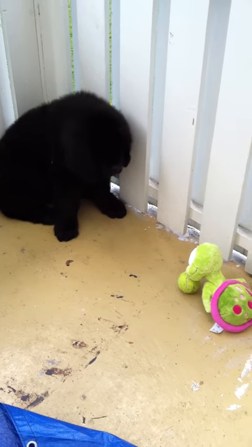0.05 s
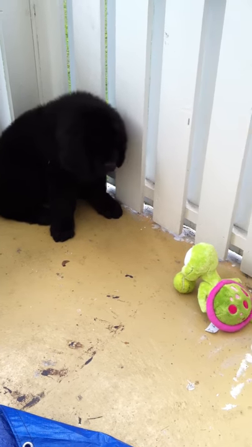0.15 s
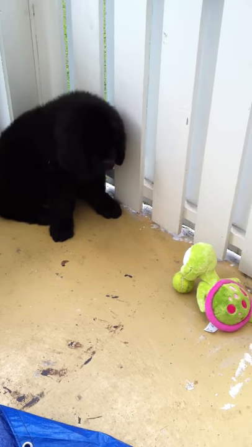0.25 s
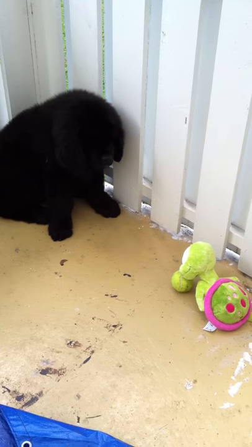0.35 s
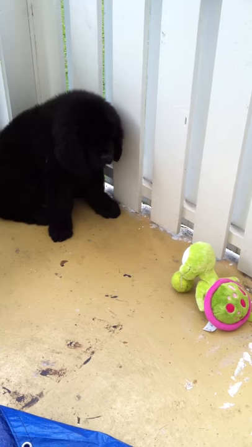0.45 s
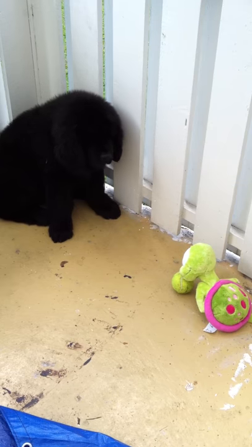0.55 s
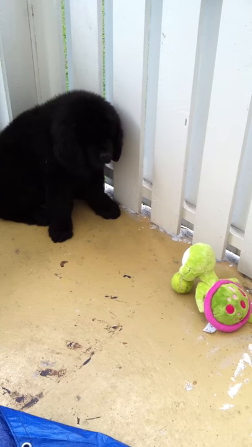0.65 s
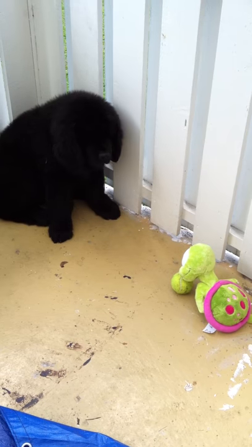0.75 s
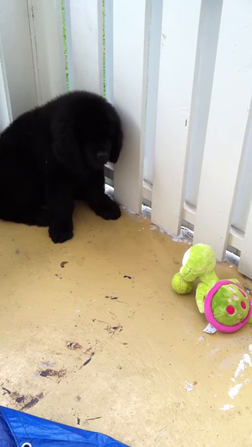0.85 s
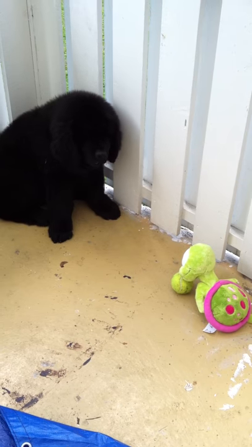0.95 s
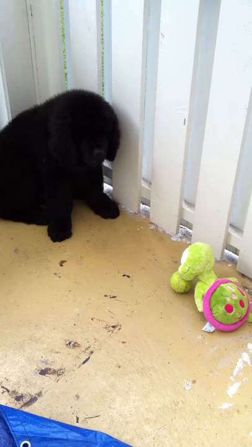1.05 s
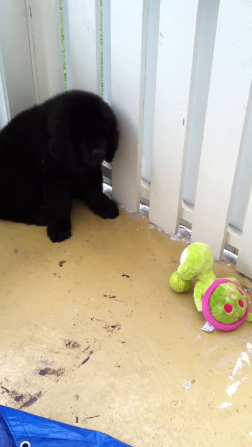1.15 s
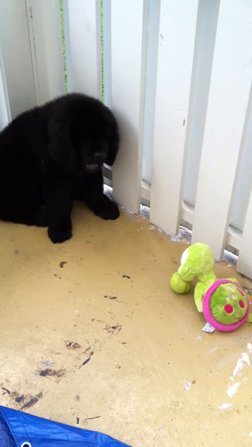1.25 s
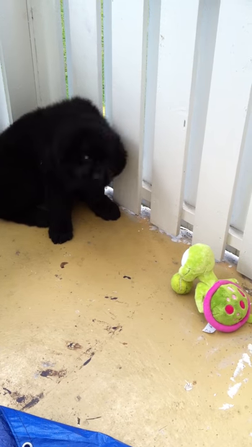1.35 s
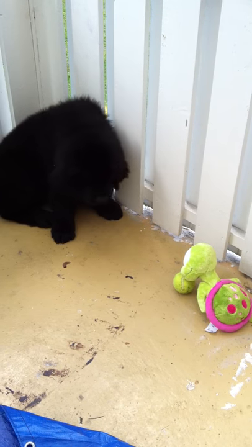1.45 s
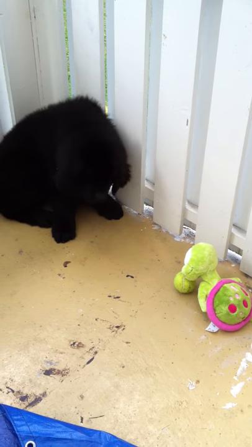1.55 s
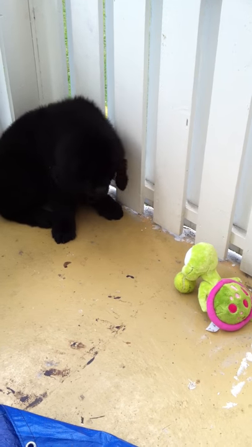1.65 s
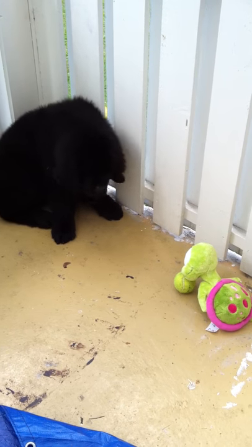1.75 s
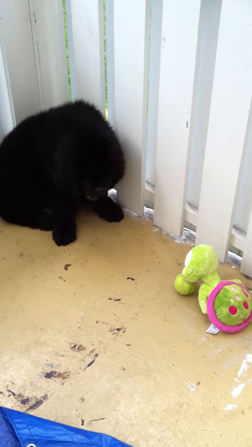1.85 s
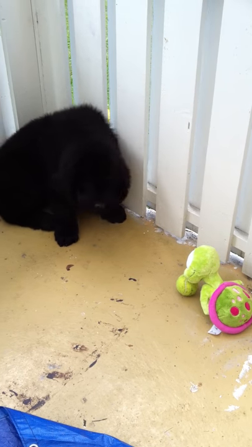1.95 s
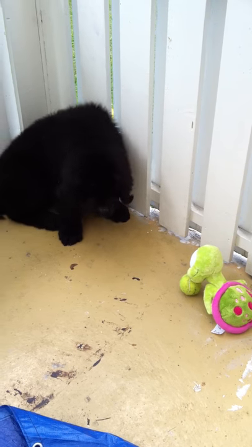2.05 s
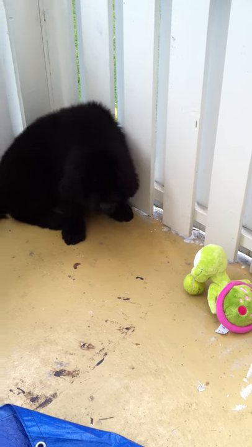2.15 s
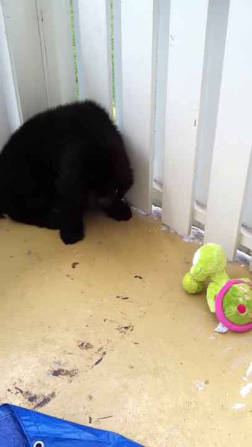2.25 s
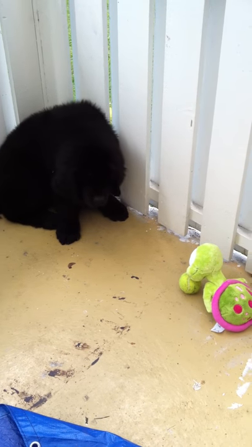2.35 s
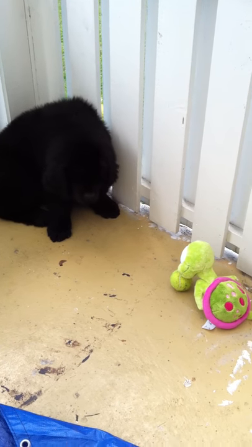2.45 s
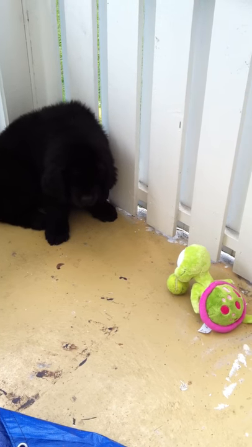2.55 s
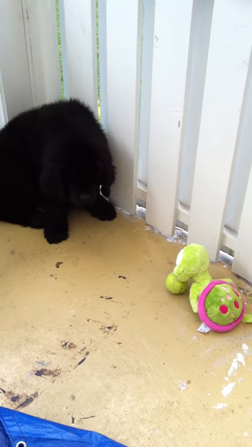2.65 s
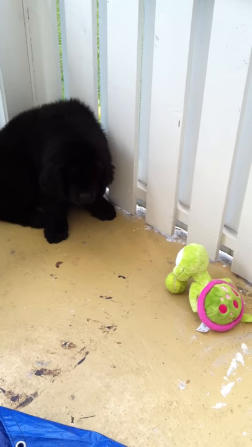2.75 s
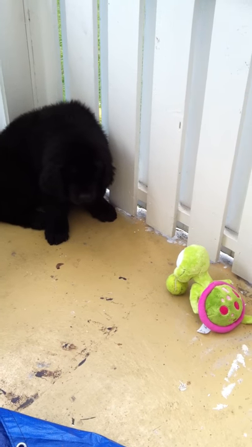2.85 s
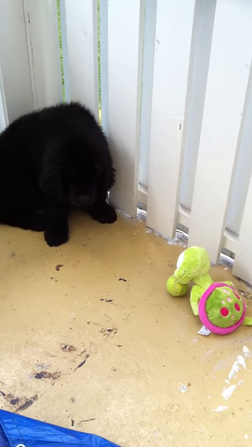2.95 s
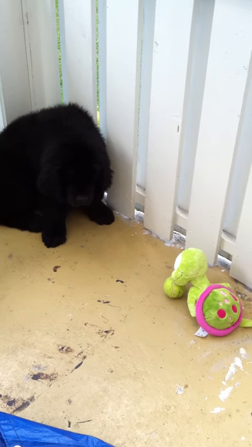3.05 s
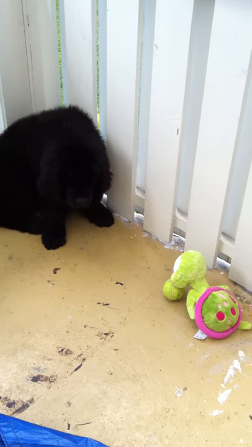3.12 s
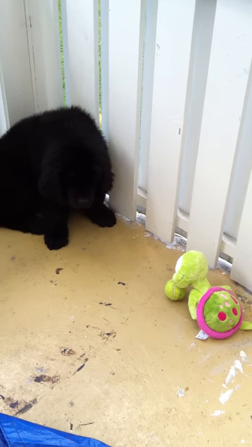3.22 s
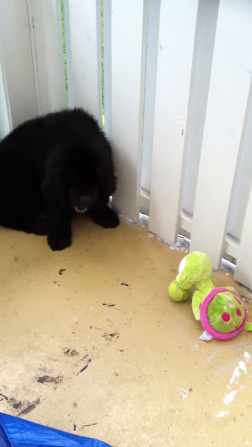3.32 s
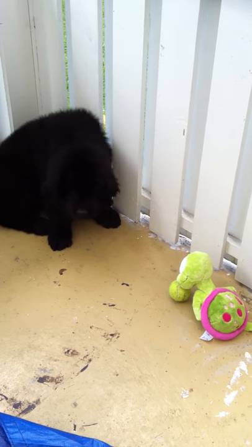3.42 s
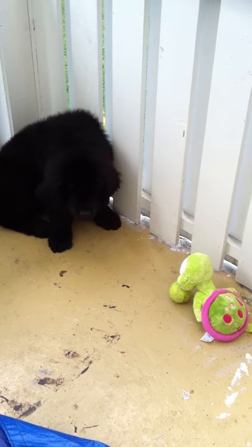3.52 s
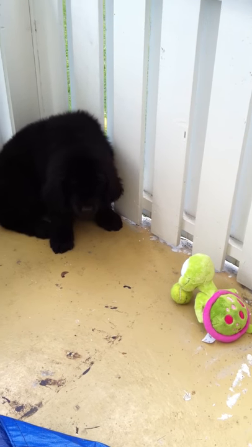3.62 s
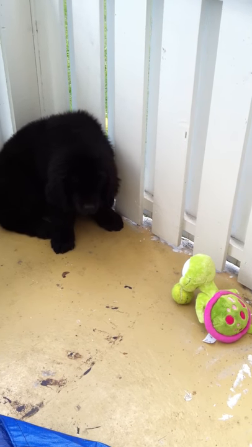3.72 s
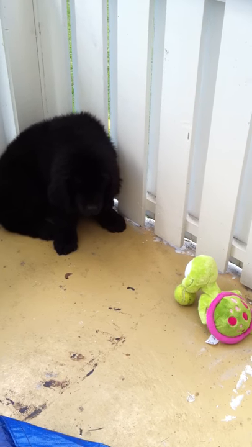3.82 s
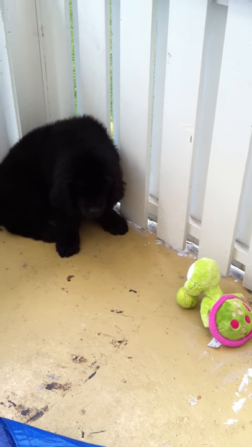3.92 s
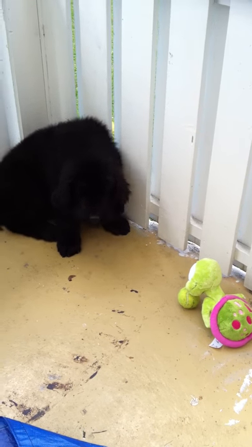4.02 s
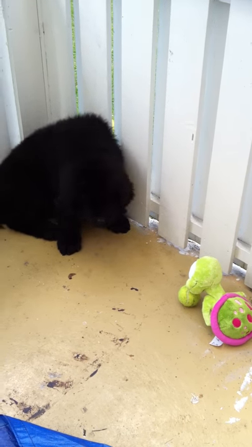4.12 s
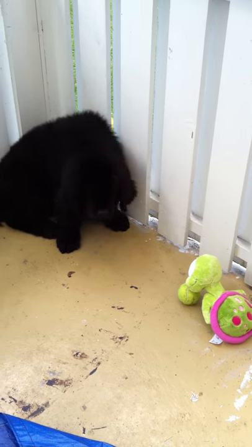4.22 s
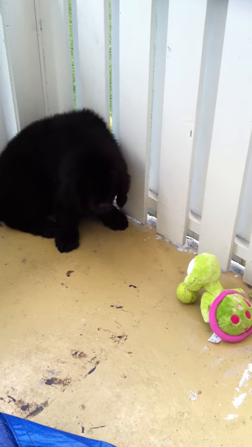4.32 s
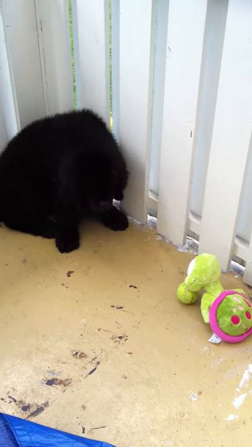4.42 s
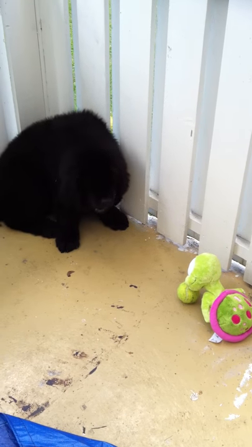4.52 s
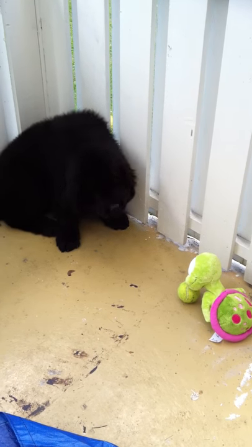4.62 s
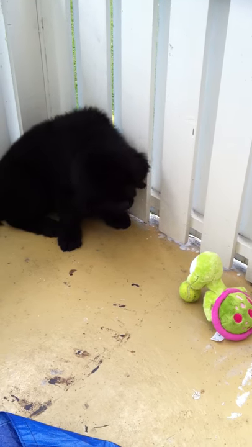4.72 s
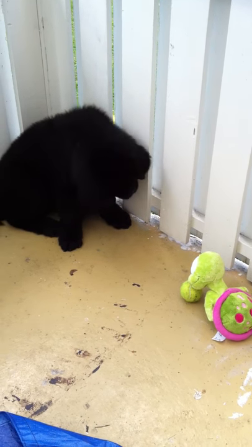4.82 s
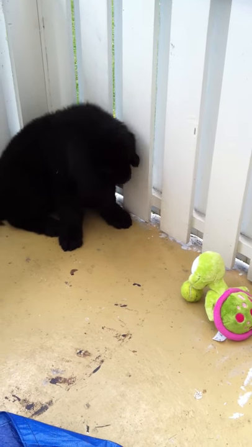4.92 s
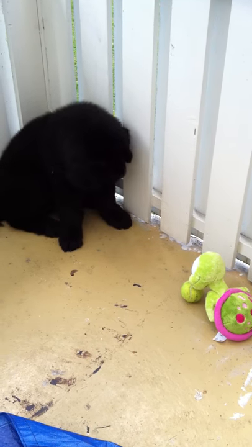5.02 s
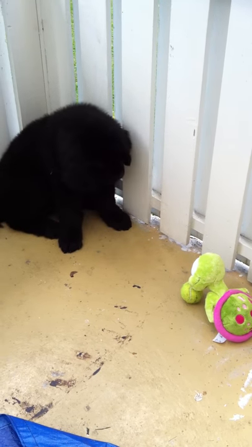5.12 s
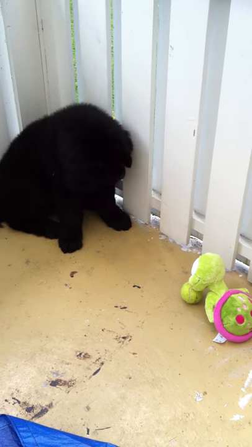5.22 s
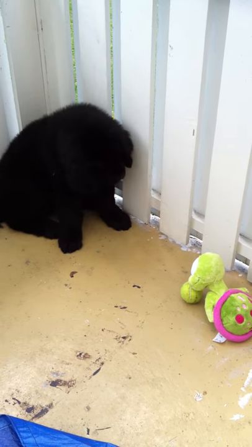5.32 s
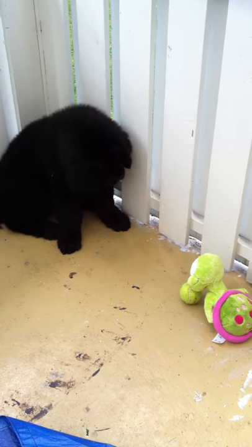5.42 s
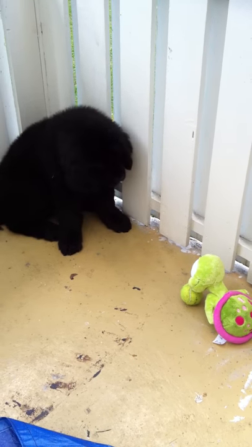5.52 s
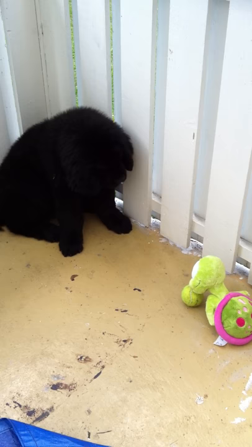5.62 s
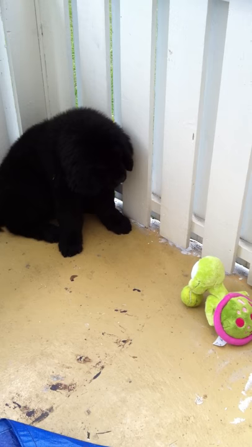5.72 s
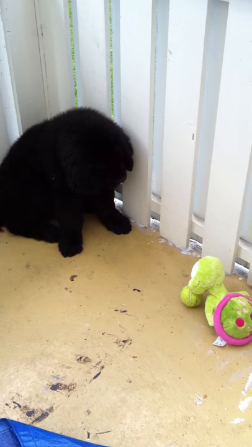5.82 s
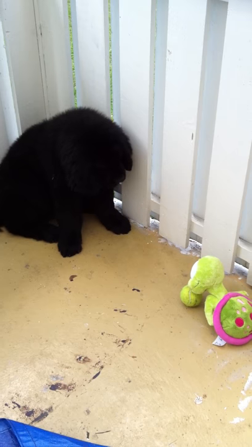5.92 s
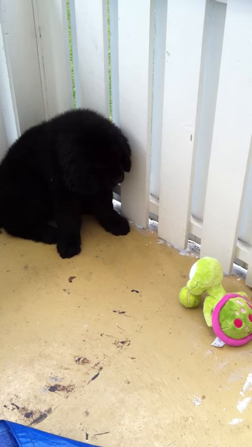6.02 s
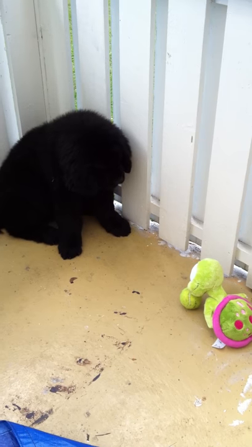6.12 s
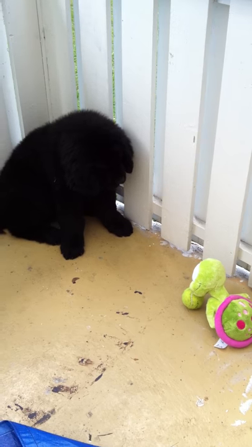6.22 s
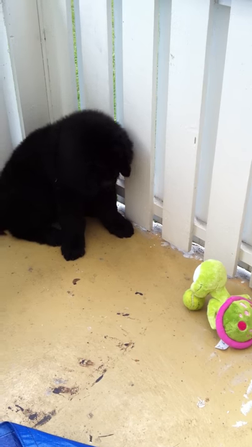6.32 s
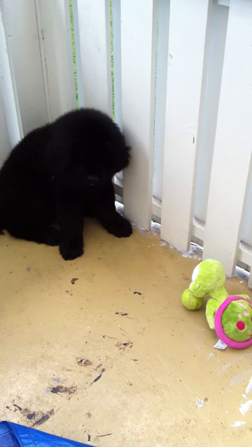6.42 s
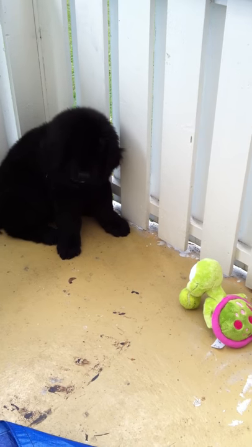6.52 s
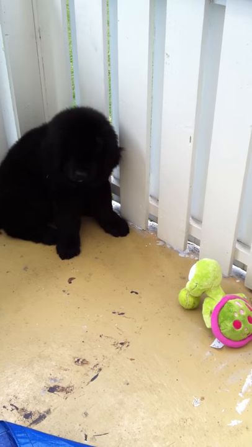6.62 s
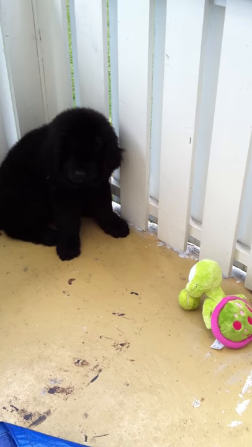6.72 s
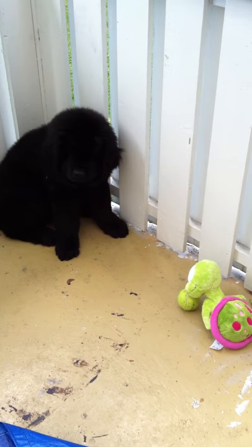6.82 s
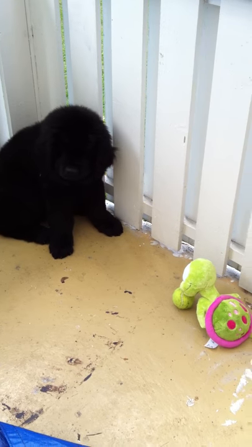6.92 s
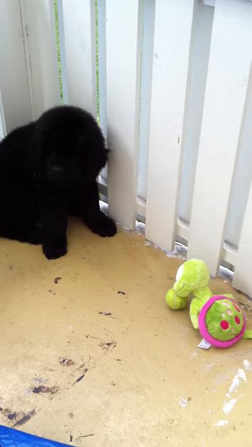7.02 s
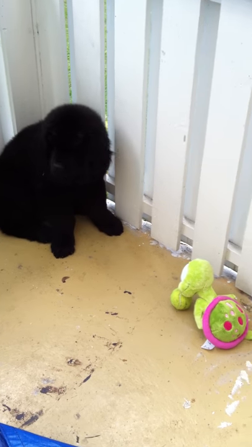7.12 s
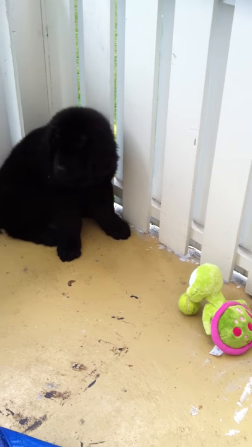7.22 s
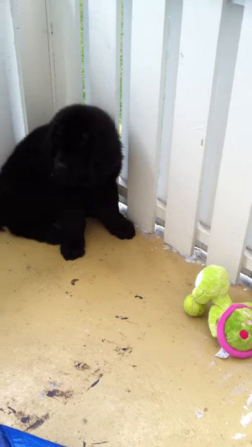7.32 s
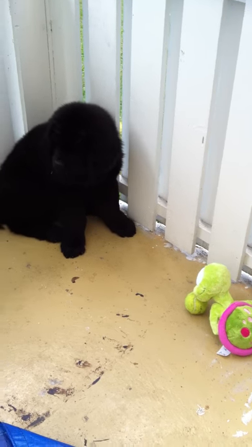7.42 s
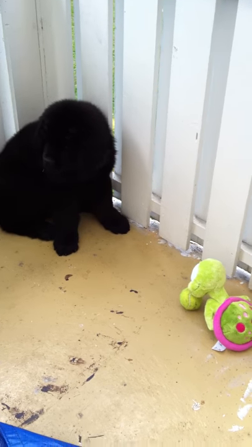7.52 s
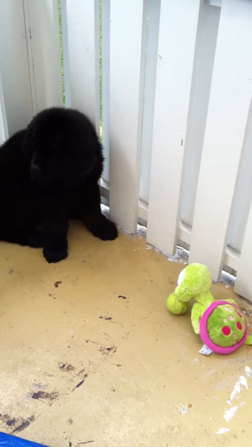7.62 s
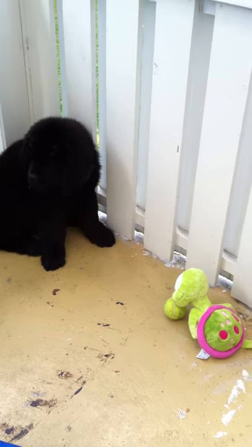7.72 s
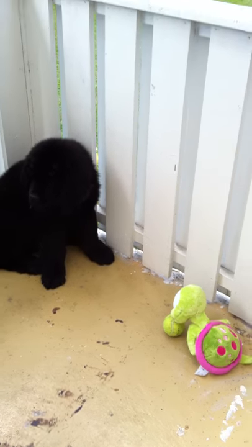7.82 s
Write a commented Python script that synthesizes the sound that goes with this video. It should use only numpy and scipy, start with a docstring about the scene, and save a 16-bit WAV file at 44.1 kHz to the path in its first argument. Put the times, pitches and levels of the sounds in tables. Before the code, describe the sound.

A puppy close to the microphone sniffs and huffs faintly, then barks twice, pauses while something brushes gritty and clicking past the microphone, and barks three more times. Each bark is short, high and raspy with a brief boxy echo from wooden boards. A soft pulsing growl follows, then fur and cloth rustles, tiny ticks, one light knock on wood and a faint whistling bird. Distant traffic hums throughout.

```python
"""A puppy barks five times near the microphone in the fenced corner of a wooden porch, huffs and growls softly.
Its barks are fold pulses and noise through throat and jaw; its growl is slow pulses that ring chest and mouth.
The boards echo the puppy; fur and cloth rustle as grains of noise, something brushes past the microphone.
Late on a bird sings gliding whistles through trees; far traffic hums as drifting noise with microphone hiss."""
import sys
import numpy as np
from scipy import signal
from scipy.fft import rfft, irfft
from scipy.io import wavfile
from scipy.ndimage import uniform_filter1d, minimum_filter1d

SR = 44100
rng = np.random.default_rng(int(sys.argv[2]) if len(sys.argv) > 2 else 0)


def unload_wav(signal):
    """Save mono or channel-first audio to the path in sys.argv[1] as 16-bit WAV at rate SR, clipped to [-1, 1]."""
    wavfile.write(
        sys.argv[1],
        SR,
        np.round(np.clip(np.atleast_2d(signal).T, -1, 1) * 32767).astype(np.int16),
    )


N = 346626  # samples, 7.86 s

# The five barks. Each row: start in seconds, rise in seconds, hold in seconds;
# top pitch, pitch break and chest note in seconds after the start; effort in dB, its sag over the hold in dB;
# first pitch, top pitch and chest pitch in Hz; jaw ring in dB above effort, its dip at top pitch in dB,
# its lift after the break in dB; chest note in dB, hiss in dB; hoarseness as a factor, half-pitch share (0-1).
BARKS = [(1.422, 0.038, 0.028, 0.076, 0.12, .15, -7, -5.5, 267.8, 413.8, 188, -1.7, -2.5, -2.5, -41.5, -36.5, 1.17, 0.48),
         (2.003, 0.037, 0.032, .062, 0.1, 0.17, -7.5, -4.5, 286.5, 409.4, 175.5, -1.3, -5.5, -4, -39.5, -36.5, 1.09, 0.91),
         (3.457, 0.043, 0.036, 0.075, .13, .156, -11.5, -2, 225, 418.2, 265.6, -1.15, -16, 1, -46, -37, 1.2, 0.4),
         (4.082, 0.042, 0.033, .07, .116, .16, -10, -4, 255.5, 425, 178.6, -1.7, -5.5, -2.5, -38.5, -38, 1.05, .6),
         (4.673, 0.039, 0.03, 0.084, 0.13, 0.16, -13, -2.5, 217.2, 417.7, 172.8, 1, -16.5, 2, -41.5, -40.5, 0.62, 0.47)]
# Throat resonances above that of the jaw. Each row: centre in Hz, width in Hz, level in dB.
THROAT = [(1062, 303, 4.5), (1240, 436, 1.5), (1732, 420, 4), (2165, 720, -2), (2466, 740, -2.5),
          (3344, 585, -17.5), (4340, 640, -26)]
# Spectrum of the hiss past the teeth. Each row: frequency in Hz, density in dB per Hz.
TEETH_HISS = [(3000, -28), (4000, -23), (4500, -4.5), (5200, -6), (5900, -3.5), (6600, -4.5), (7600, -1.5),
              (9200, -0.5), (11000, -10.5), (12500, -16), (15800, -16.5)]
RASP = 0.5  # level factor of the whistle past the teeth at 420 Hz pitch


def bark(s, *row):
    """Uneven fold pulses and gated noise pass the throat and a jaw resonance that falls as the mouth shuts."""
    effort_db, hz, jaw_hz, jaw_db, hiss_db, chest_db, rough, half = gestures(*row)
    rough = np.clip(rough, 0, 1)
    jitter, shimmer, noise, air = rng.standard_normal((4, len(hz)))
    uneven_hz = hz * (1 + 0.05 * rough * evened(uniform_filter1d(jitter, size=150)))
    turns = np.cumsum(uneven_hz) / SR

    folds = sum(np.cos(2 * np.pi * k * turns) for k in range(1, 16))
    folds *= 1 + half * np.cos(np.pi * turns)  # every other pulse is weaker
    folds *= gain_of(7.1 * rough * evened(uniform_filter1d(shimmer, size=200)))
    gate = 0.47 + np.exp(-(turns % 1) / 0.5)  # air rushes just after each opening
    drive = (1 - rough) * evened(folds) + rough * 1.3 * evened(gate * noise)

    slack_db = effort_db - effort_db.max()  # slack folds lose their upper partials
    throat = 0
    for k, (f, width, db) in enumerate(THROAT):
        gain = gain_of(db + 0.3 * slack_db * np.log2(f / 1250))
        throat = throat + (-1) ** k * gain * steep(drive, f, width)
    jaw = gain_of(jaw_db) * evened(steep(drive, jaw_hz, 250))
    voice = gain_of(effort_db) * evened(throat) - jaw

    # the air whistles past the teeth when the folds are tightest
    rasp = RASP * (hz / 420) ** 4 * evened(steep(air, 6460, 1000))
    hiss = gain_of(hiss_db) * evened(gate * (coloured(air, TEETH_HISS) + rasp))
    chest = gain_of(chest_db) * np.sqrt(2) * np.sin(2 * np.pi * turns)
    return s, fade(voice + hiss + chest, 0.034)


# Mouth at eight stages: start, open, wide, top pitch, before the break, after it, chest note, end.
# Each row: jaw resonance in Hz, its lift in dB, part of the half-pitch share as a factor.
STAGES = [(827, -5, .2), (904, 0.5, 0.39), (783, 1.5, 0.73), (750, -0.5, 0.25), (537, 1, 1), (457, -3, .5),
          (330, 2, .4), (270, -8.5, .4)]
# Roughness of the folds at the same stages, before the hoarseness factor. One value a stage.
ROUGH = [.35, .28, .36, .42, .6, .45, .25, .25]
KNEE_TIME, KNEE_PITCH = 0.63, 0.8  # the climb slows after these shares of its time and height
OPEN, WIDE = 0.41, 0.65  # the jaw snaps open, then starts to shut: shares of the climb time
BREAK_S, CLOSE_S = 0.024, 0.042  # the pitch breaks downward; the bark closes after the chest note
BREAK_HZ, LAST_SAG = 280, 0.87  # pitch after the break; last pitch as a share of the chest note
RISE_DB, RISE_BEND, RELEASE_DB_PER_S = -34.5, 1.3, -330
HISS_RISE, HISS_FALL = 0.82, 0.66  # dB of hiss lost per dB of effort, before and after the hold
CHEST_DB, CHEST_RISE_S, CHEST_FALL_S = -62, 0.022, 0.05  # chest level away from its note, and its ramps


def gestures(rise, hold, top, snap, note, db, sag_db, first_hz, top_hz, note_hz,
             ring_db, dip_db, late_db, note_db, air_db, hoarse, halving):
    """What lungs, folds and jaw do through one bark: effort, climbing and breaking pitch, jaw opening."""
    t = np.arange(0, note + CLOSE_S, 1 / SR)
    before_db = RISE_DB * np.clip(1 - t / rise, 0, 1) ** RISE_BEND
    after_db = RELEASE_DB_PER_S * np.maximum(t - rise - hold, 0)
    effort_db = db + before_db + sag_db * np.clip((t - rise) / hold, 0, 1) + after_db

    climb = first_hz + (top_hz - first_hz) * np.interp(t / top, [0, KNEE_TIME, 1], [0, KNEE_PITCH, 1])
    drop_times = [snap - BREAK_S, snap, note, t[-1]]
    drop = np.interp(t, drop_times, [top_hz, BREAK_HZ, note_hz, LAST_SAG * note_hz])
    hz = np.minimum(climb, drop)

    at = np.maximum.accumulate([0, OPEN * top, WIDE * top, top, *drop_times])
    columns = [*np.transpose(STAGES), ROUGH]
    jaw_hz, lift_db, part, rough = (np.interp(t, at, column) for column in columns)
    jaw_db = effort_db + ring_db + lift_db
    jaw_db += dip_db * np.clip(1 - abs(t - top) / 0.029, 0, 1)
    jaw_db += late_db * np.clip((t - snap) / BREAK_S + 1, 0, 1)

    hiss_db = air_db + HISS_RISE * before_db + HISS_FALL * after_db
    note_share = np.interp(t - note, [-CHEST_RISE_S, 0, CHEST_FALL_S], [0, 1, 0])
    chest_db = CHEST_DB + (note_db - CHEST_DB) * note_share
    return effort_db, hz, jaw_hz, jaw_db, hiss_db, chest_db, hoarse * rough, halving * part


# Bouts of growl pulses. Each row: start in seconds, number of pulses, first gap and last gap in seconds.
GROWL = [(5.406, 14, .0415, .0491), (6.069, 1, .049, .049), (6.118, 8, .025, .0243)]
# Ring of the chest. Each row: frequency in Hz, relative level in dB, time to fall 60 dB in seconds.
CHEST = [(167.2, -2, 0.06), (294, -12, 0.088), (382, -4.5, 0.061)]
GROWL_DB, GROWL_FADE_S, GROWL_DB_PER_S = -46, 6.04, -26.5  # chest pulse peaks: steady, then fading
UNEVEN_DB = 3.8  # spread from pulse to pulse
MOUTH_OPEN_DB, MOUTH_SHUT_DB = -41.5, -55  # added to the levels of the mouth's own ring
MOUTH_S, SHUT_S = 0.049, 0.084  # the mouth is open around MOUTH_S into the growl
NOSE_DB, NOSE_DB_PER_S = -65.5, -19  # puffs from the nose, weaker as the growl goes on


def growl():
    """Slow single pulses ring the chest and, at first, the open mouth; each has a puff from the nose."""
    out, t = np.zeros(N), np.arange(1500) / SR
    pulse = ring(CHEST, 0.12, rise=0.0076)
    pulse /= abs(pulse).max()
    mouth = ring([(755, 6.7, 0.05), (918, 9.1, 0.045)], 0.08, rise=0.01)
    for start, count, gap, last_gap in GROWL:
        count = round(count)
        times = start + np.cumsum(np.append(0, np.linspace(gap, last_gap, count - 1)))
        for s, noise in zip(times, rng.standard_normal((count, 1500))):
            age = s - GROWL[0][0]
            peak_db = GROWL_DB + GROWL_DB_PER_S * max(s - GROWL_FADE_S, 0)
            openness = np.exp(-((age - MOUTH_S) / SHUT_S) ** 2)
            mouth_db = MOUTH_SHUT_DB + (MOUTH_OPEN_DB - MOUTH_SHUT_DB) * openness
            puff_db = NOSE_DB + NOSE_DB_PER_S * age - 60 * t / 0.052
            add(out, s, gain_of(peak_db + UNEVEN_DB * noise[0]) * pulse)
            add(out, s, gain_of(mouth_db + 2.7 * noise[1]) * mouth)
            add(out, s, gain_of(puff_db) * evened(steep(noise, 6360, 900)))
    return out


# Unvoiced huffs. Each row: peak in seconds, rise in seconds, fall in seconds,
# then the levels of the low, middle and high resonances in dB.
HUFFS = [(.965, .08, 0.11, -55, -64.5, -70), (2.83, .11, 0.23, -72, -68, -80.5)]
# Low, middle and high mouth resonances, one group each. Each row: centre in Hz, width in Hz, relative dB.
HUFF_TONE = [
    [(466.5, 80, -1), (774, 100, 0.5), (1134, 80, -3.5)],
    [(2360, 980, 17), (2760, 260, 8)],
    [(3500, 170, 8), (4470, 220, 1)],
]


def huffs():
    """Breath through the mouth: noise in three groups of resonances that swell and sink."""
    out = np.zeros(N)
    for peak, rise, fall, *levels in HUFFS:
        s, shape_db = swell(peak, rise, fall, bend=1.74)
        air = rng.standard_normal(len(shape_db))
        for level_db, modes in zip(levels, HUFF_TONE):
            tone = sum(gain_of(db) * evened(steep(air, hz, width)) for hz, width, db in modes)
            add(out, s, fade(gain_of(level_db + shape_db) * evened(tone), 0.3))
    return out


# Sniffs. Each row: peak in seconds, rise in seconds, fall in seconds, then the level of each nose resonance in dB.
SNIFFS = [(.002, .05, .09, -70, -64, -70), (.054, 0.1, 0.053, -80, -78, -57.5),
          (.112, .08, 0.054, -66.5, -63.5, -89)]
# Nose resonances. Each row: centre in Hz, width in Hz.
NOSE = [(5100, 430), (2520, 240), (520, 30)]


def sniffs():
    """Breath through the nose: separate noise in each nose resonance."""
    out = np.zeros(N)
    for peak, rise, fall, *levels in SNIFFS:
        s, shape_db = swell(peak, rise, fall, bend=1.5)
        for db, (hz, width) in zip(levels, NOSE):
            air = rng.standard_normal(len(shape_db))
            add(out, s, gain_of(db + shape_db) * evened(resonate(air, hz, width)))
    return out


# The paw against a slat. Each row: start in seconds, peak in dB.
KNOCK = [(7.2578, -32.5)]
# Ring of the slat. Each row: frequency in Hz, relative level in dB, time to fall 60 dB in seconds.
SLAT = [(1140, -5, .06), (1270, -1, .07), (1400, -5, .06), (1530, 0, .07), (1990, -11, .05)]


def knock():
    """One paw knock on a slat: dying modes of the wood with a very fast start."""
    out, blow = np.zeros(N), ring(SLAT, 0.15, rise=0.00029)
    for s, db in KNOCK:
        add(out, s, gain_of(db) * blow / abs(blow).max())
    return out


# Near echoes from floor and slats. Each row: delay in seconds, signed gain as a factor.
ECHOES = [(.00204, -0.27), (.0049, 0.37), (.0083, .25), (0.0129, -0.45)]
# Decay of the scattered tail. Each row: frequency in Hz, time to fall 60 dB in seconds.
PORCH = [(150, 0.55), (400, 0.53), (1040, 0.45), (2760, 0.37), (7280, 0.35), (14000, 0.05)]
# Standing waves of the corner. Each row: frequency in Hz, relative level in dB, time to fall 60 dB in seconds.
BOARDS = [(289.9, -2.5, 0.16), (500, 12, 0.38), (773, -12, 0.42), (1282, 3.5, 0.32), (1820, -12, .35),
          (2090, -10, 0.62)]


def porch(x):
    """Near echoes, a scattered tail and the standing waves of the corner."""
    taps = np.zeros(SR // 2)
    at = np.arange(300, len(taps) - 20, 20)
    taps[at + rng.integers(0, 20, len(at))] = rng.choice([-1., 1.], len(at))
    hz, t, z = signal.stft(taps, SR, nperseg=256)
    decay = gain_of(-60 * t / read(PORCH, hz)[:, None])
    tail = signal.istft(z * decay, SR, nperseg=256)[1][:len(taps)]

    # uneven slats split each wave into a cluster, so that it beats as it dies
    age, stir = np.arange(len(taps)) / SR, rng.standard_normal(len(taps))
    waves = np.zeros(len(taps))
    for f, db, t60 in BOARDS:
        cluster = 0.4 * np.sin(2 * np.pi * f * age) + evened(steep(stir, f, 90))
        waves += gain_of(db - 60 * age / t60) * cluster

    echo = gain_of(-14.5) * tail / np.linalg.norm(tail) + gain_of(-19.5) * waves / np.linalg.norm(waves)
    for delay, gain in ECHOES:
        add(echo, delay, np.array([gain]))
    return signal.oaconvolve(x, echo)[:N]


# Low thumps at the loudest moments. Each row: start in seconds, peak in dB.
THUMPS = [(1.465, -58), (2.041, -50.5), (2.57, -60), (3.5, -37), (4.135, -58), (4.73, -40.5)]


def thumps():
    """One soft low push each: a single smooth hump of 14 ms."""
    out = np.zeros(N)
    for s, db in THUMPS:
        add(out, s, gain_of(db) * np.hanning(round(0.014 * SR)))
    return out


# Something brushes past the microphone. Each row: peak in seconds, rise in seconds, fall in seconds, level in dB.
BRUSH = [(2.578, .062, .092, -40.5)]
# Spectrum of the brush. Each row: frequency in Hz, density in dB per Hz.
BRUSH_TONE = [(60, -30), (240, -0.5), (500, -1), (1300, -11), (2500, -4.5), (4000, -13.5), (7500, -14.5),
              (11000, -16.5), (15800, -18)]


def brush():
    """A dry gritty brush at the microphone: coarse noise grains that swell and sink."""
    out = np.zeros(N)
    for peak, rise, fall, top_db in BRUSH:
        s, shape_db = swell(peak, rise, fall, bend=1.9)
        grit = grains(len(shape_db), size=40, spread_db=1.6)
        add(out, s, gain_of(top_db + shape_db) * coloured(grit, BRUSH_TONE))
    return out


# Claw and cloth ticks by the microphone. Each row: start in seconds, peak in dB, centre in Hz.
TICKS = [(2.54, -42, 2770), (2.553, -36.5, 2460), (2.566, -52, 2460), (2.5944, -25.5, 3670),
         (2.5976, -22, 2390), (2.608, -31.5, 2180), (5.162, -50.5, 3840), (5.2017, -58.5, 5010),
         (5.8326, -45.5, 4000), (5.88, -48, 2800), (5.904, -41, 11400), (6.0392, -44.5, 3970),
         (6.634, -44.5, 2600), (6.85, -46, 5970), (7.1105, -47, 3800), (7.6684, -41, 5030),
         (7.8154, -51, 6000)]
TICK_WIDTH, SCATTER_S = 0.85, 0.036  # width as a share of the centre; seconds for the scatter to fall 60 dB


def ticks():
    """Small dry ticks: resonant noise with a quick snap and its slower scatter."""
    out, t = np.zeros(N), np.arange(2500) / SR
    decay = gain_of(-60 * t / 0.0067) + 0.2 * gain_of(-60 * t / SCATTER_S)
    for s, db, hz in TICKS:
        tick = decay * steep(rng.standard_normal(len(t)), hz, TICK_WIDTH * hz)
        add(out, s, gain_of(db) * tick / abs(tick).max())
    return out


# Single rustles. Each row: peak in seconds, rise in seconds, fall in seconds,
# bright share in dB, dull share in dB above it.
RUSTLE = [(.005, .05, .2, -67, -15), (.108, .12, .08, -67, -8), (5.048, .04, 0.093, -66.5, -10),
          (5.24, .1, 0.063, -62.5, -13), (5.752, 0.072, .1, -58.5, 0), (5.854, 0.041, 0.064, -59.5, -5),
          (5.906, 0.017, 0.077, -56.5, -21), (6.06, 0.3, 0.72, -65.5, -1.5),
          (6.67, 0.064, .08, -52.5, -0.5), (6.852, 0.014, 0.06, -57, -22), (6.946, 0.15, .27, -66, -12),
          (7.596, 0.11, .12, -67, -10), (7.67, 0.014, .07, -56.5, -4), (7.816, .09, .4, -72, -5)]
# Steady rustle under them. Each row: time in seconds, level of the bright share in dB.
STIR = [(4.98, -95), (5.15, -86.5), (5.32, -89), (5.416, -70), (5.7, -78.5), (6.28, -79.5), (6.4, -99),
        (6.6, -80), (6.8, -70), (7.04, -77.5), (7.338, -75), (7.374, -67.5), (7.52, -73), (7.64, -89),
        (7.7, -72), (7.86, -75)]
STIR_DULL_DB = -1.5  # dull share above the bright one


def rustle():
    """Fur and cloth: fine grains of treble, a dull and a bright share."""
    brightness, dullness = np.zeros((2, N))
    s, stir_db = unfold(STIR)
    add(brightness, s, gain_of(stir_db))
    add(dullness, s, gain_of(stir_db + STIR_DULL_DB))
    for peak, rise, fall, db, dull_db in RUSTLE:
        s, shape_db = swell(peak, rise, fall, bend=0.72)
        add(brightness, s, gain_of(db + shape_db))
        add(dullness, s, gain_of(db + dull_db + shape_db))
    fibres = grains(N, size=60, spread_db=1.5)
    # spectra in (Hz, dB per Hz)
    dull = coloured(fibres, [(1500, -1), (2800, 2.5), (6000, -4.0), (8500, -46)])
    bright = coloured(fibres, [(5500, -17), (7500, -10.5), (15800, -10.5)])
    return brightness * bright + dullness * dull


# Notes of the bird beyond the trees. Each row: start in seconds, length in seconds,
# first, turning and last pitch in Hz, turn as a share of the length, level in dB.
BIRD = [(6.955, .145, 4750, 4240, 4370, .42, -67.5), (7.14, .17, 6080, 6030, 5950, 0.4, -63.5),
        (7.305, .2, 5220, 3920, 4150, 0.53, -66.5), (7.5, .16, 5600, 6150, 6070, .65, -65),
        (7.69, 0.11, 4850, 4080, 4150, 0.82, -64.5)]
NOTE_TOP, NOTE_START_DB, NOTE_END_DB = 0.22, -4, -14.5  # loudest at this share; ends relative to it


def bird():
    """Thin gliding whistles, blurred by the trees they come through."""
    out = np.zeros(N)
    for s, length, first_hz, turn_hz, last_hz, turn, top_db in BIRD:
        u = np.arange(0, length, 1 / SR) / length
        to_turn = first_hz + (turn_hz - first_hz) * np.sin(np.pi / 2 * u / turn)
        hz = np.where(u < turn, to_turn, np.interp(u, [turn, 1], [turn_hz, last_hz]))
        db = top_db + np.interp(u, [0, NOTE_TOP, 1], [NOTE_START_DB, 0, NOTE_END_DB])
        whistle = np.sqrt(2) * np.sin(2 * np.pi * np.cumsum(hz) / SR)
        blur = evened(resonate(rng.standard_normal(len(hz)), hz, 180))
        add(out, s, fade(gain_of(db) * (0.56 * whistle + 0.63 * blur), 0.18))
    t = np.arange(6000) / SR
    trees = rng.standard_normal(6000) * gain_of(-60 * t / 0.47)
    return out + 0.9 * signal.oaconvolve(out, trees / np.linalg.norm(trees))[:N]


# Spectrum of the far road, with microphone hiss on top. Each row: frequency in Hz, density in dB per Hz.
TRAFFIC = [(20, -51), (55, -46), (95, -25.5), (160, -3), (220, -11.5), (290, -4), (420, -13.5), (600, -6.5),
           (850, -4), (1300, -8), (2000, -16.5), (3000, -26.5), (5000, -33.5), (9000, -35), (15800, -37.5)]
# Level of the far road. Each row: time in seconds, level in dB.
TRAFFIC_LEVEL = [(0, -57.5), (1.298, -56), (3.199, -55.5), (5.299, -57), (6.5, -55.5), (7.86, -54)]


def traffic():
    """Far road noise: random short-time spectra with faint drifting patches."""
    frames, hz = N // 256 + 5, np.fft.rfftfreq(1024, 1 / SR)
    a, b, patches = rng.standard_normal((3, 513, frames))
    patches = uniform_filter1d(patches, size=8, axis=0)  # over frequency
    patches = evened(uniform_filter1d(patches, size=14, axis=1))  # over time
    z = (a + 1j * b) * gain_of(read(TRAFFIC, hz)[:, None] + 1.3 * patches)
    hum = evened(signal.istft(z, nperseg=1024, noverlap=768)[1][:N])
    s, db = np.transpose(TRAFFIC_LEVEL)
    return gain_of(np.interp(np.arange(N) / SR, s, db)) * hum


def gain_of(db):
    """Decibels to a factor."""
    return 10 ** (np.asarray(db) / 20)


def evened(x):
    """Scales to rms 1."""
    return x / np.sqrt(np.mean(x ** 2) + 1e-20)


def add(mix, s, sound):
    """Mixes a sound in at time s."""
    part = mix[round(s * SR):][:len(sound)]
    part += sound[:len(part)]


def fade(x, share):
    """Soft ends."""
    return x * signal.windows.tukey(len(x), share)


def unfold(rows):
    """Start time and level of a curve table, one value a sample."""
    s, level = np.transpose(rows)
    return s[0], np.interp(np.arange(s[0], s[-1], 1 / SR), s, level)


def swell(peak, rise, fall, bend):
    """Start time and a level in dB that climbs 30 dB to a peak and sinks 30 dB again, cut off at time 0."""
    s = max(peak - rise, 0)
    t = np.arange(s, peak + fall, 1 / SR) - peak
    return s, -30 * np.where(t < 0, -t / rise, t / fall) ** bend


def read(points, hz):
    """Value of a table on a log frequency axis."""
    f, value = np.transpose(points)
    return np.interp(np.log(hz + 1), np.log(f + 1), value)


def coloured(x, spectrum):
    """Gives x a spectrum, rms 1."""
    gain = gain_of(read(spectrum, np.fft.rfftfreq(len(x), 1 / SR)))
    return evened(irfft(rfft(x) * gain, len(x)))


def grains(count, size, spread_db):
    """Noise whose level jumps every few samples, with rare strong grains."""
    jumps = rng.exponential(1, count // size + 1).repeat(size)[:count]
    return rng.standard_normal(count) * gain_of(spread_db * jumps)


def resonate(x, hz, width):
    """Shifts the curve hz down to zero, smooths, and shifts back: a resonance of gain 1."""
    turn = np.exp(2j * np.pi * np.cumsum(hz * np.ones(len(x))) / SR)
    r = np.exp(-np.pi * abs(width) / SR)
    return 2 * (turn * signal.lfilter([1 - r], [1, -r], x / turn)).real


def steep(x, hz, width):
    """A resonance passed twice: dark skirts."""
    return resonate(resonate(x, hz, width), hz, width)


def ring(modes, seconds, rise):
    """Dying sines with a soft start."""
    t = np.arange(round(seconds * SR)) / SR
    sines = sum(gain_of(db - 60 * t / t60) * np.sin(2 * np.pi * hz * t) for hz, db, t60 in modes)
    return (1 - np.exp(-t / rise)) * sines


def scene():
    """Everything at the one microphone; the porch answers only the puppy and its knock."""
    puppy = growl() + huffs() + sniffs() + knock()
    for row in BARKS:
        add(puppy, *bark(*row))
    close = brush() + ticks() + thumps() + rustle()
    return (puppy + porch(puppy) + close + bird() + traffic())[None]


EDGE_HZ = 15800  # upper band limit


def record(dry):
    """Low cut, gain control that ducks loud sounds and recovers slowly, a peak limiter, then the treble limit."""
    x = signal.sosfilt(signal.butter(1, 30, "high", fs=SR, output="sos"), dry)
    power_db = 10 * np.log10(abs(uniform_filter1d(x[0] ** 2, size=800)) + 1e-12)
    fall = np.arange(N) * 16.0 / SR  # the held level sinks by so many dB a second
    held_db = np.maximum.accumulate(power_db + fall) - fall
    over_db = np.maximum(held_db + 27.0, 0)
    x = x / gain_of(0.095 * uniform_filter1d(over_db, size=400))
    crest = uniform_filter1d(-minimum_filter1d(-abs(x[0]), size=300), size=150)
    x = x * np.minimum(1, 0.78 / (crest + 1e-9))
    low_pass = signal.firwin(511, EDGE_HZ, window=("kaiser", 9), fs=SR)
    return signal.oaconvolve(x, low_pass[None], "same")


dry = scene()
out = record(dry)
unload_wav(out)
```